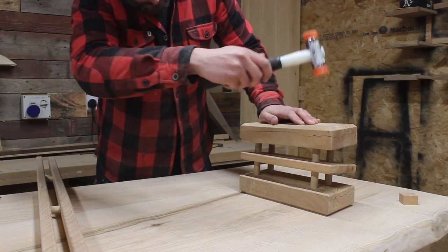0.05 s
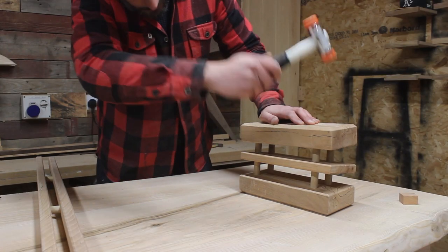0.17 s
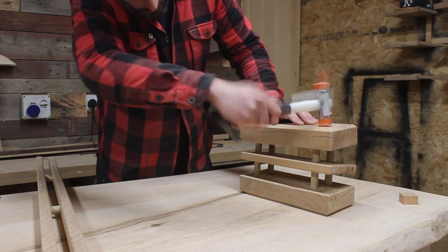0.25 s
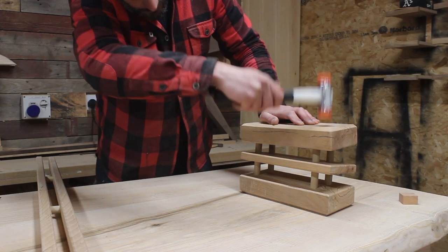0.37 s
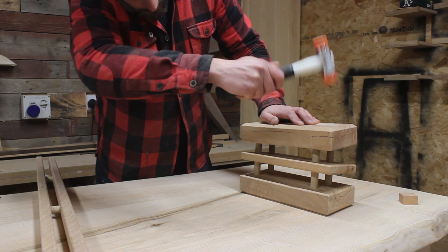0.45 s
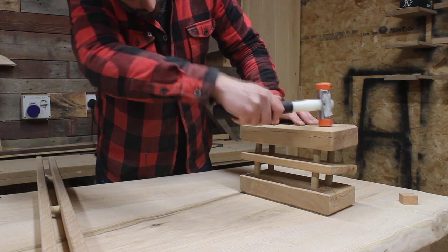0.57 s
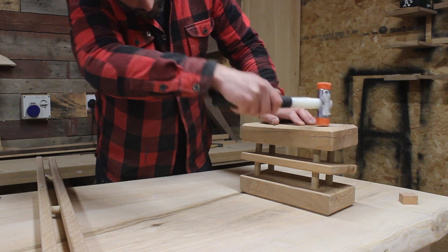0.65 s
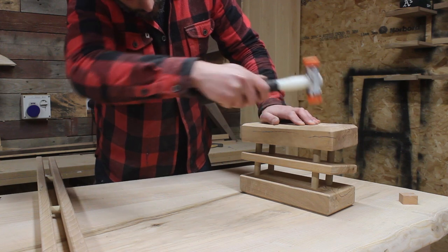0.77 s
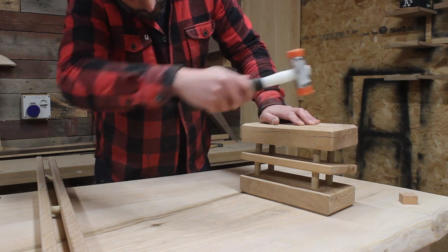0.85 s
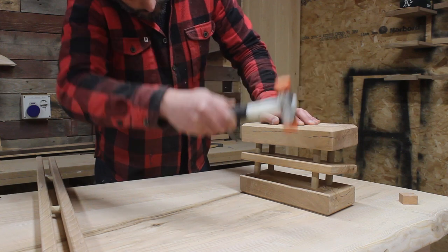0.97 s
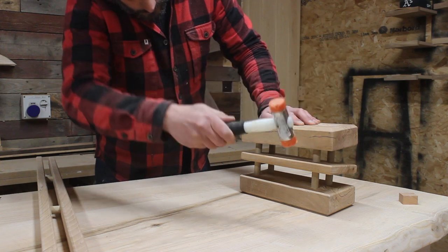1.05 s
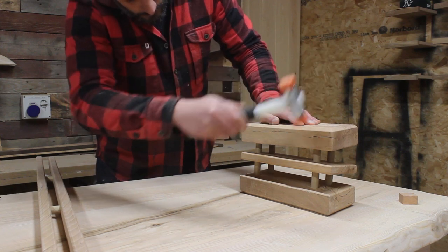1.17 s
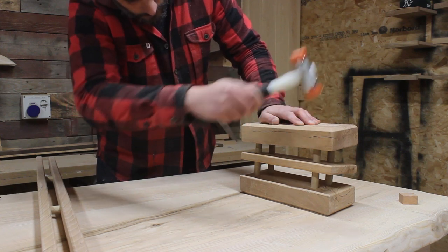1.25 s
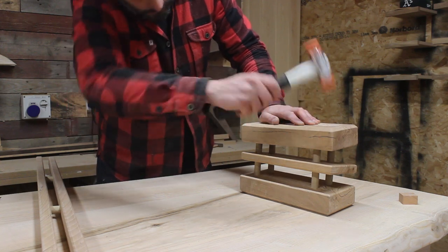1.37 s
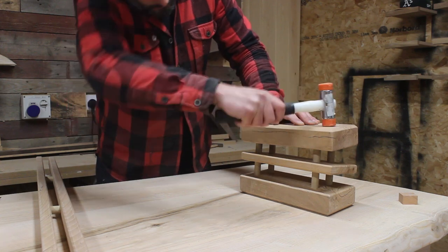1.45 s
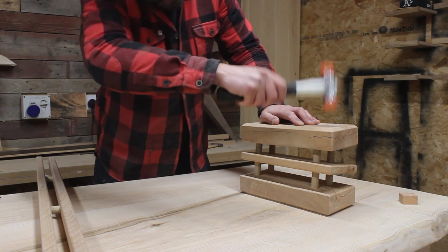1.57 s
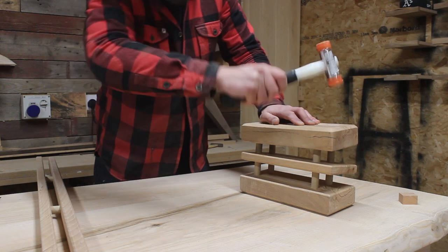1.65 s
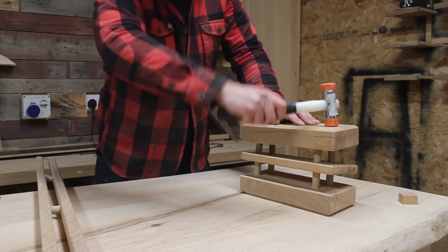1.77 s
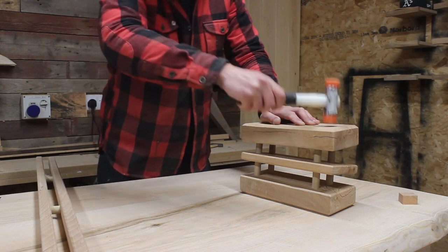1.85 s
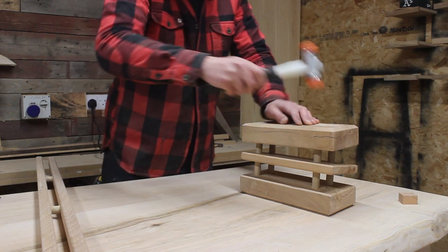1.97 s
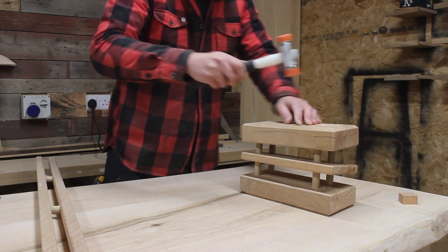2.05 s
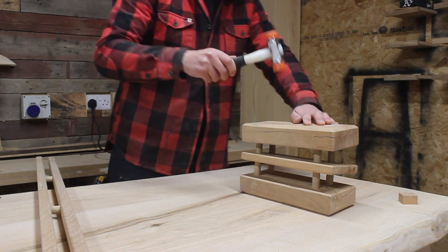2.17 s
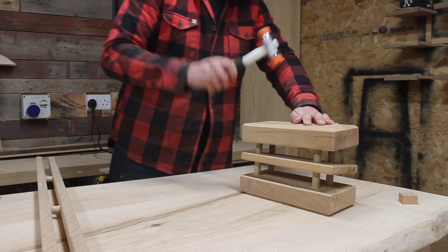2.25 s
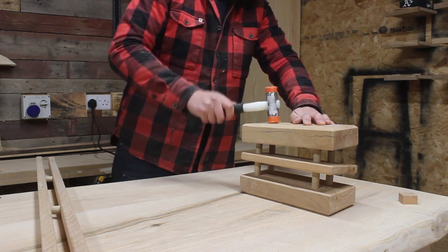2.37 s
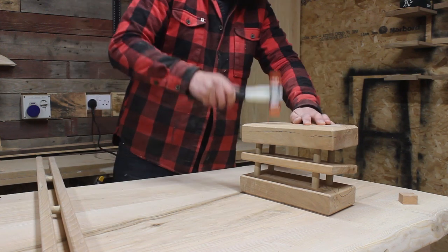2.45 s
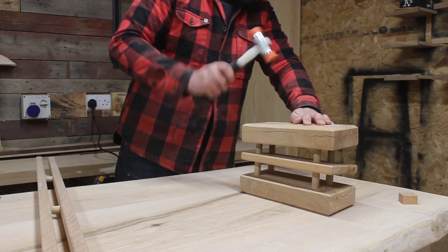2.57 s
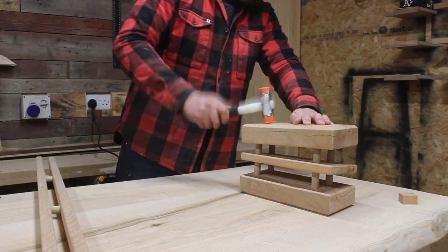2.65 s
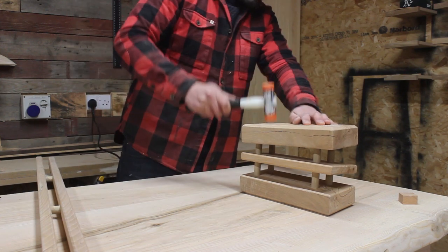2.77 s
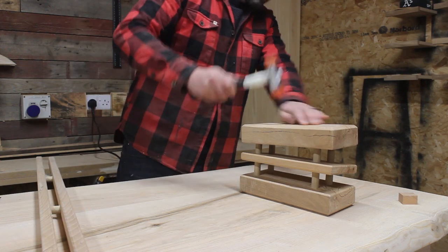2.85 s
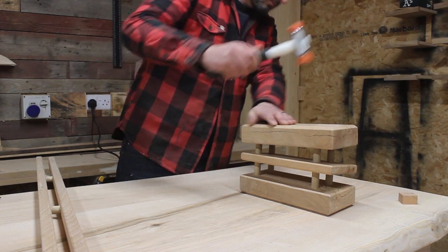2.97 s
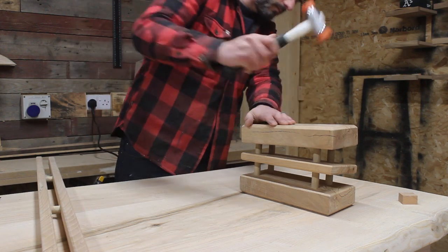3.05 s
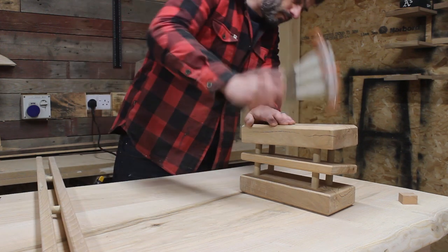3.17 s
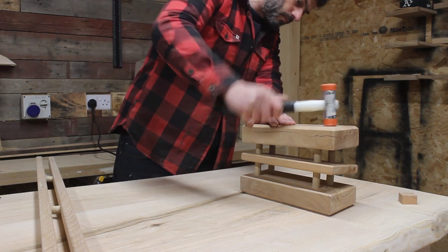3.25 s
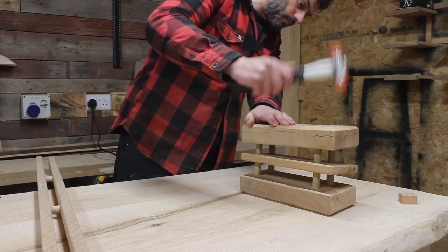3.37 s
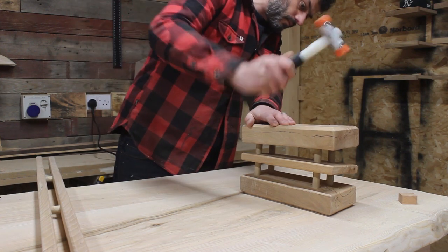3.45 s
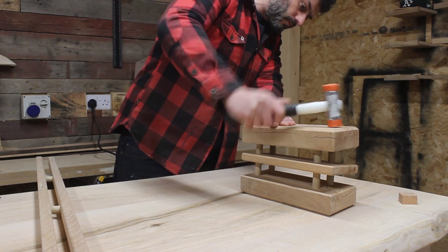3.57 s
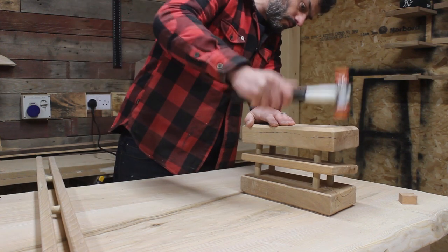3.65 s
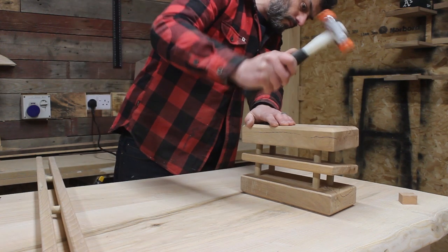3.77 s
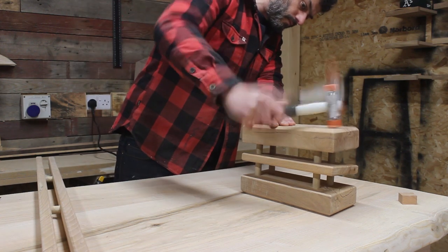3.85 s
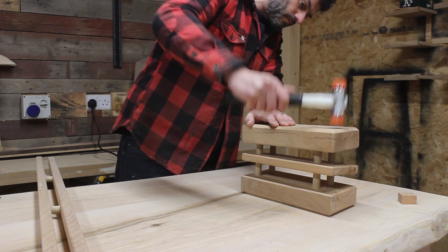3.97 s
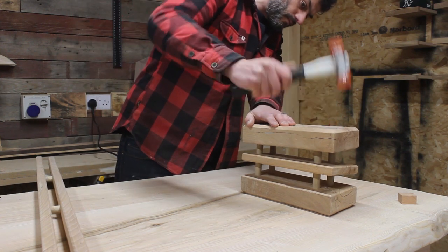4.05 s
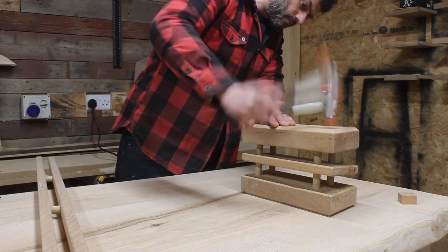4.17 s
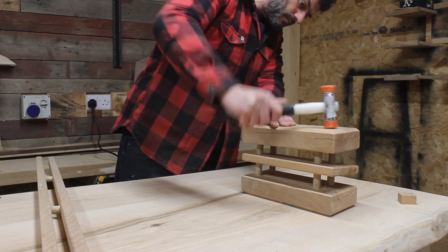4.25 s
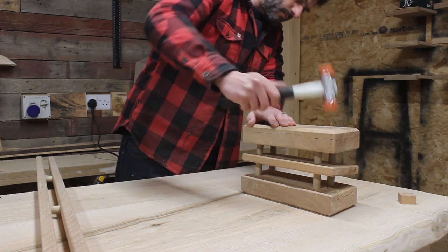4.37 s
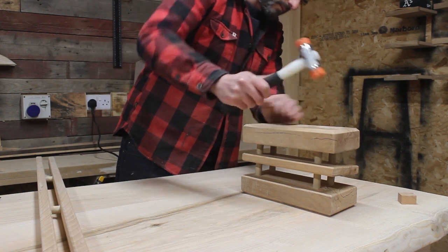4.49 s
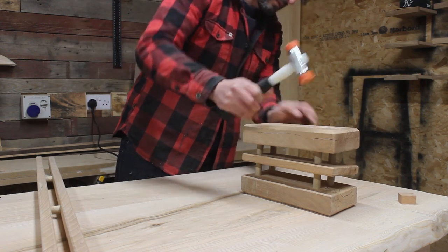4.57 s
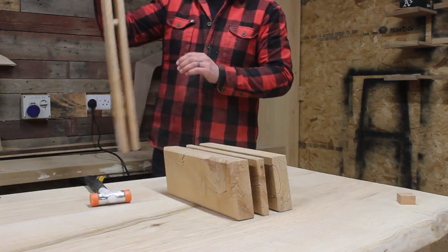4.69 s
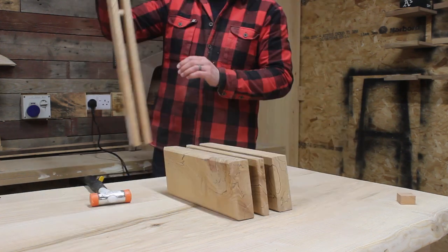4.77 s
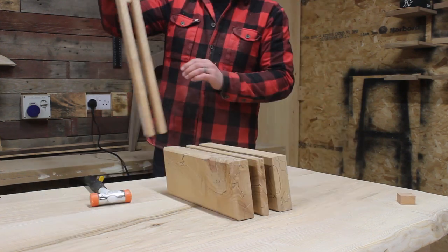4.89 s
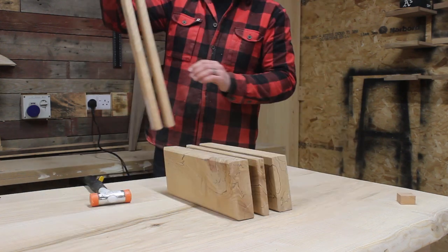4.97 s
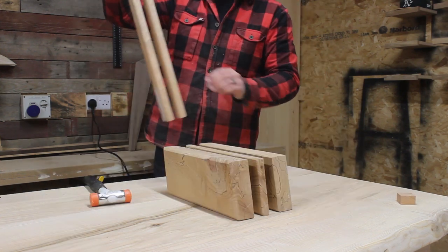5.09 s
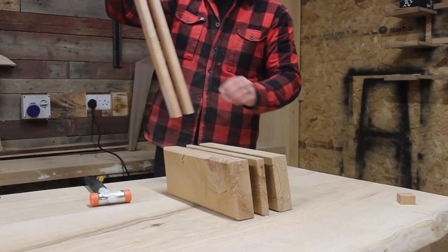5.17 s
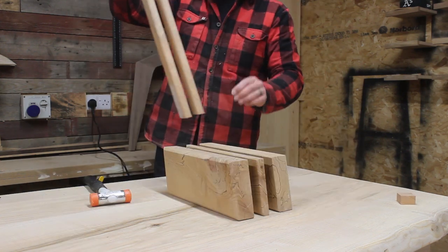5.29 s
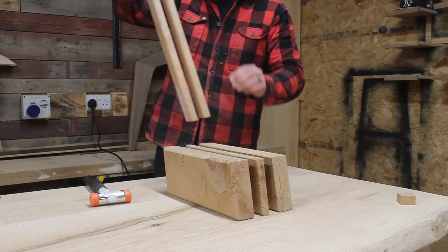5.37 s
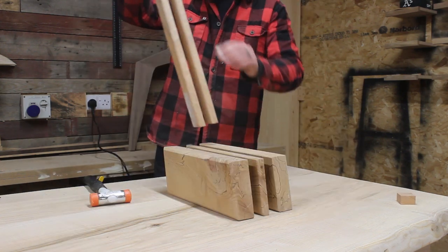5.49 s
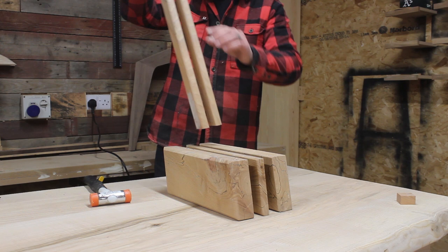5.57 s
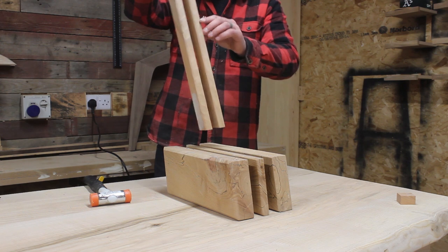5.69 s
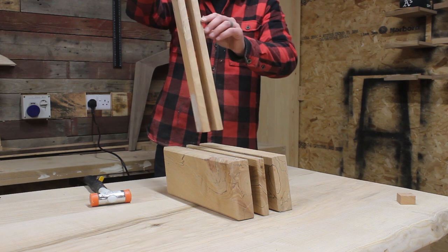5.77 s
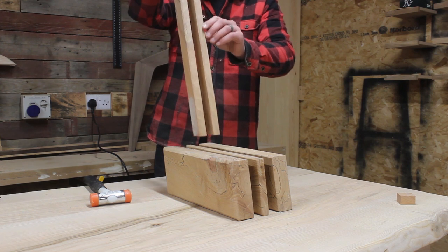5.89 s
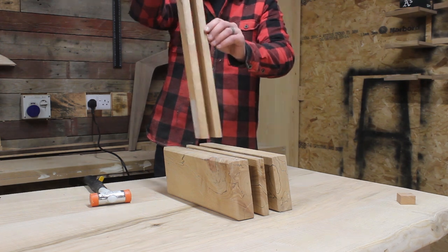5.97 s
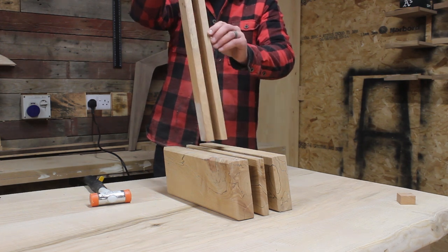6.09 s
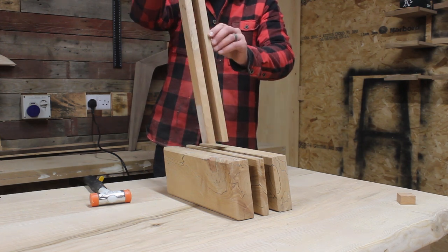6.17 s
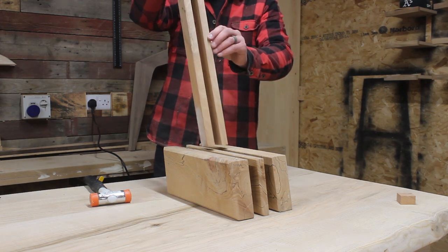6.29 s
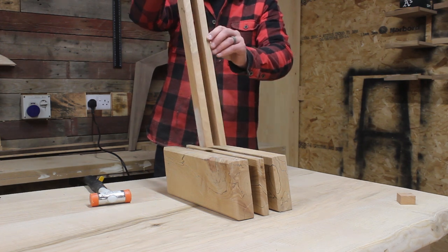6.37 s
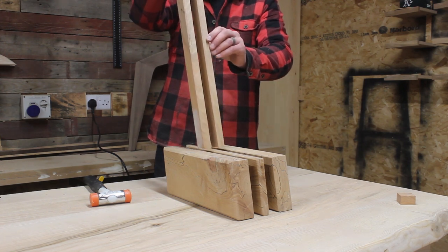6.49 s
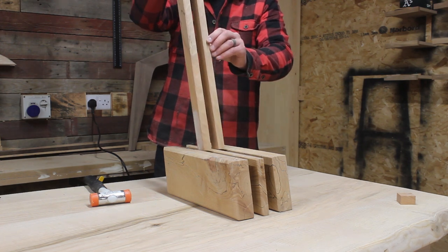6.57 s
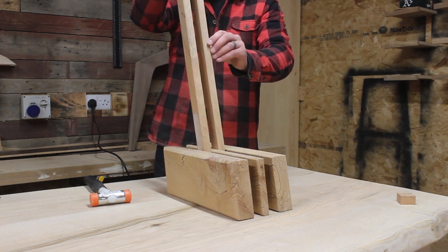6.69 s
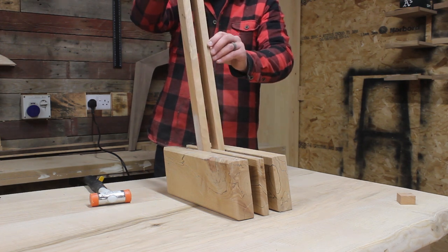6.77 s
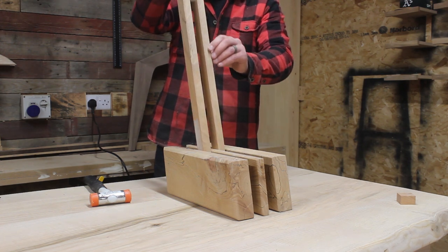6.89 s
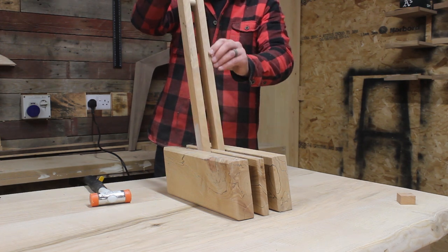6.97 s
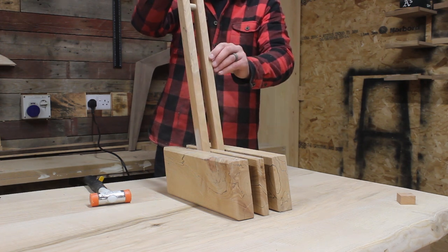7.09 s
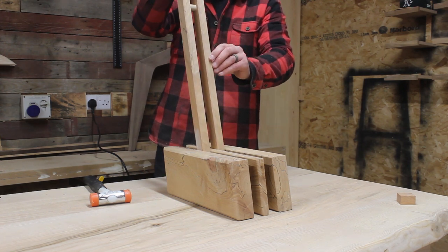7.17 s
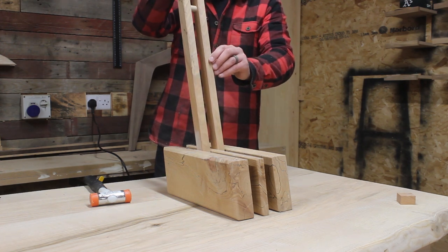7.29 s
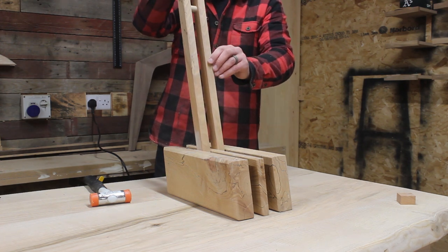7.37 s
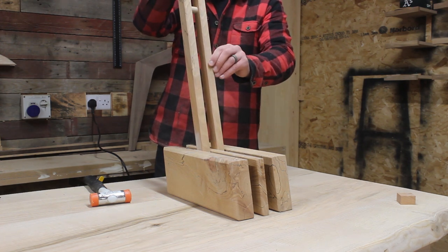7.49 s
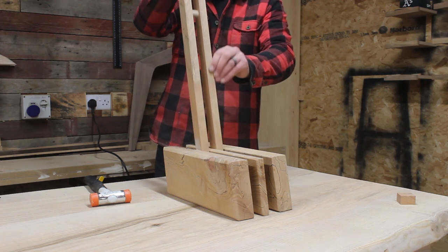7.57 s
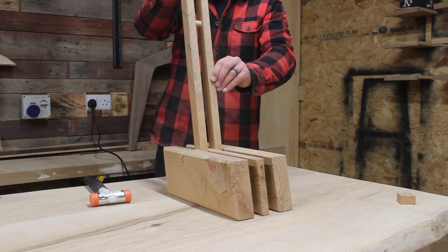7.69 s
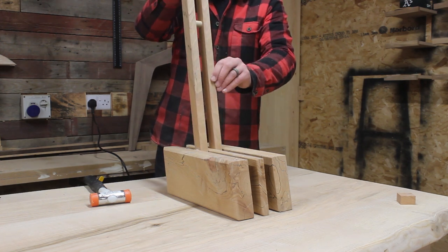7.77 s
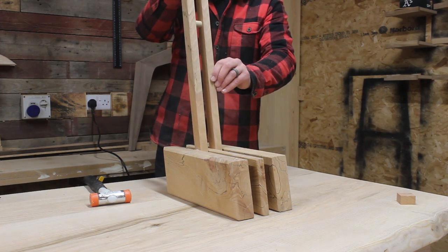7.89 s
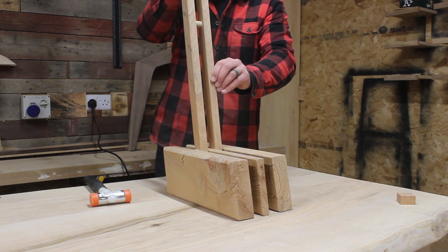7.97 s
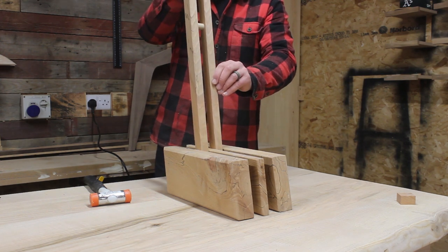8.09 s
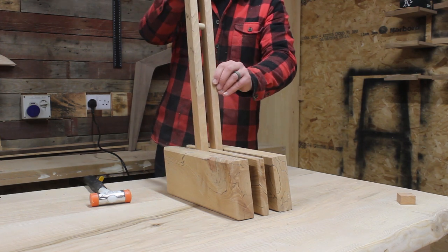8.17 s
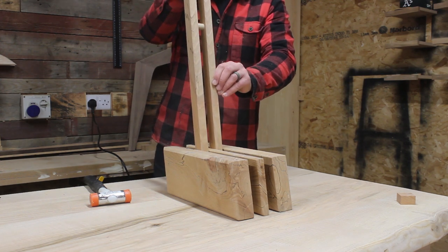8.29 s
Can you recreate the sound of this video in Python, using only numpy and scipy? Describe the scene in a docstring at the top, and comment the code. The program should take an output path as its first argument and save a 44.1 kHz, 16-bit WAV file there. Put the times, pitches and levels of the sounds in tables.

```python
"""In a timber workshop a soft-faced mallet drives a block onto its dowels, in groups of two and four blows.
Each blow excites the decaying modes of block and bench. After a brief dip in level, a pair of rails drops
into the slotted blocks, is knocked, and slides down: collisions and friction grains ring the rail modes.
Squeaks are unsteady harmonic tones and chirps are pure glides; reflections and steady air surround them.
The camera's gain control ducks the room at loud sounds, then lets it creep back; peaks it misses are clipped."""
import sys
import numpy as np
from scipy import signal
from scipy.fft import rfft, irfft
from scipy.io import wavfile
from scipy.ndimage import uniform_filter1d

SR = 44100
rng = np.random.default_rng(int(sys.argv[2]) if len(sys.argv) > 2 else 0)


def to_wav(sig):
    """Store sig (one row per channel, or 1-D mono) as 16-bit WAV at the path in sys.argv[1].

    Samples outside -1..1 are clipped; the rate is SR.
    """
    pcm = np.clip(np.atleast_2d(sig), -1, 1) * 32767
    pcm = np.round(pcm).astype(np.int16)
    wavfile.write(sys.argv[1], SR, pcm.T)  # frames by channels


def volts_from_db(level):
    """Convert decibel levels to linear amplitude ratios."""
    exponent = np.asarray(level, float) / 20
    return 10 ** exponent


N = 367353  # samples heard
LEAD = round(.4 * SR)  # samples computed before time zero
SPAN = N + LEAD

# Mallet blows: start_s, energy_db, bench_thud_db, hollow_ring_db, hollow_centre_hz
MALLET_BLOWS = [(-.29, 39.5, 6, 5.5, 1130), (0.346, 40, 4.5, 6, 1155), (.652, 35.5, 5, 3.5, 1059),
                (1.5175, 39.5, 5.5, 3.5, 1130), (1.806, 37.5, 5, 3.5, 1036), (2.4299, 41, -5.5, 6, 1130),
                (2.743, 40, -2, 7, 1130), (3.2921, 37.5, -1.5, 3, 1686), (3.617, 40, -2, 4, 1330),
                (3.949, 40, -6.5, 2.5, 1330), (4.278, 36.5, 1, 2.5, 1756)]
# Modes of block and bench, before each blow scatters them: pitch_hz, level_db, t60_s
BLOCK_MODES = [(72, -19, 0.95), (83.4, -21, 0.72), (102, -27, 0.83), (153, -17, 0.41), (185.3, -25.5, 0.8),
               (277, 7.5, 0.0057), (307, -3.5, .04), (409.7, -4.5, 0.059), (483, -6.5, 0.014),
               (525, -13, 0.075), (609.8, -4.5, 0.11), (714, -6.5, 0.071), (805, -2, 0.028),
               (1000, 7, 0.013), (1073, -4, 0.078), (1130, -5, 0.013), (1230, -5, 0.032),
               (1330, -1.5, 0.019), (1500, -9, 0.02), (1746, 3, 0.028), (2116, -5.5, 0.055),
               (2340, -15.5, .04), (4220, -23, 0.047)]
# Block modes too dense to tell apart, heard as a crack: frequency_hz, relative_level_db
BLOCK_DENSE_MODES = [(60, 10.5), (250, 38.5), (850, 40.5), (1200, 45), (2000, 37.5), (2600, 23), (4000, -1),
                     (7000, 21), (11000, 1), (16000, -13.5), (22050, -29)]
# Rails meeting the slots, and at 7.8 s a low thump of the bench: start_s, level_db, centre_hz, spread_octaves,
# crack_against_ring_db
RAIL_KNOCKS = [(6.03, -11, 893, 2.6, -9.5), (6.05, -19, 345, 1.9, -7), (6.1, -18.5, 485, 2, -12),
               (6.239, -37, 3000, 1.7, 4), (6.445, -40, 280, 1.34, -15), (6.556, -34, 4450, 1.57, -30),
               (6.674, -31, 520, 1.65, -14), (6.697, -33.5, 5000, 2.3, -20), (6.733, -29, 800, 0.2, -10),
               (6.751, -24.5, 1560, 0.92, 5), (6.76, -34, 147, 0.5, -21), (6.78, -31, 940, 0.27, -23),
               (7.512, -41.5, 2340, 0.49, -6), (7.735, -36.5, 5920, 1.6, 2), (7.761, -38.5, 186, 0.45, -7),
               (7.792, -29, 1500, 1.8, -1), (7.8, -38, 110, 0.65, -4), (7.81, -23, 860, 1.3, -16),
               (7.84, -30, 620, 0.3, -20), (7.875, -27.5, 640, 0.48, -24), (8.025, -37.5, 6000, 2.2, -16),
               (8.031, -40, 280, 0.77, -12), (8.308, -37, 620, 0.24, -20)]
# Modes of the rails when knocked, before scatter: pitch_hz, level_db, t60_s
RAIL_MODES = [(153, -11.5, 0.18), (268, 6, 0.039), (557, -4, 0.03), (620, -18.5, 0.027), (705, -9, 0.1),
              (800, -22.5, 0.11), (1122, -7.5, 0.022), (1240, -14.5, 0.032), (1560, -10.5, 0.019),
              (2057, -11.5, 0.049), (2365, -17.5, 0.049), (3000, -38, 0.071), (4590, -32, 0.13)]
# Rail modes too dense to tell apart, heard as a crack: frequency_hz, relative_level_db
RAIL_DENSE_MODES = [(60, 66), (250, 41), (1000, 47), (2500, 40.5), (5000, 29), (10000, 5), (16000, 22),
                    (22050, 8.5)]
# Strokes of wood sliding on wood: fastest_s, speeding_up_s, slowing_down_s, level_db, centre_hz
SLIDE_STROKES = [(6.075, .045, 0.063, -22, 1800), (6.7, .03, 0.031, -37.5, 800),
                 (7.04, .25, 0.22, -44.5, 1900), (7.71, 0.12, 0.062, -39, 3890),
                 (7.86, .07, 0.18, -37.5, 1303), (8.14, .09, 0.12, -49.5, 2500),
                 (8.325, .025, .03, -42.5, 700)]
# Stick-slip squeaks: start_s, length_s, level_db, pitch_hz, step_per_harmonic_db
STEADY_SQUEAKS = [(6.273, .025, -45, 1990, -4), (6.305, .025, -54, 1960, -4), (6.345, .03, -46, 2040, -14),
                  (7.665, .06, -42, 3400, -14), (7.795, .09, -49, 4650, -20)]
# Faint pure glides in the quiet: start_s, length_s, level_db, first_hz, last_hz
FAINT_CHIRPS = [(4.655, .08, -50, 3230, 3150), (4.79, .075, -53, 3100, 3500),
                (4.865, .075, -50, 3000, 3600), (4.795, .11, -57, 4540, 4780)]
# Reflections from bench and near walls: delay_ms, level_db
EARLY_REFLECTIONS = [(2.1, -17.5), (5.3, -15.5), (8.6, -12.5), (12.4, -9.5), (18.5, -12), (27, -9.5)]
# Reverberation of the workshop: frequency_hz, t60_s
SHOP_DECAY = [(100, 0.73), (260, 0.37), (700, 0.65), (1200, 0.58), (1840, 0.53), (4850, 0.41),
              (12800, 0.15)]
# Spectrum of rumble and hiss: frequency_hz, relative_level_db (per Hz)
AIR_SPECTRUM = [(15, -34.5), (25, 0), (43, -1), (76, -8), (123, -5.5), (210, -4.5), (261, -5), (448, -2.5),
                (927, -9), (1090, -7.5), (2380, -16), (8460, -29), (15700, -28.5)]


def mallet():
    """Modal excitation: a broadband force rings block and bench; where it lands sets thud and hollow ring."""
    tilt_db_per_octave, hollow_octaves = -2, .2
    out = np.zeros(SPAN)
    for s, energy_db, thud_db, hollow_db, hollow_hz in MALLET_BLOWS:
        def colour_db(hz):
            tilt = tilt_db_per_octave * np.log2(hz / 1000)
            thud = thud_db * np.exp(-(np.log2(hz / 300) / 0.7) ** 2)
            hollow = hollow_db * np.exp(-(np.log2(hz / hollow_hz) / hollow_octaves) ** 2)
            return tilt + thud + hollow
        body = ring(BLOCK_MODES, BLOCK_DENSE_MODES, 0, colour_db, scatter_db=1.8, detune=.008)
        add(out, s, volts_from_db(energy_db) * signal.fftconvolve(strike(), unit(body)))
    return out


def strike():
    """Two-stage contact: the soft face slaps flat, then squeezes; together they favour no frequency."""
    slap_band = signal.butter(4, 2900, "high", fs=SR, output="sos")
    press_band = signal.butter(4, 2900, fs=SR, output="sos")
    slap = signal.sosfilt(slap_band, contact(1.4))
    press = signal.sosfilt(press_band, contact(3.4))
    force = rfft(press + np.sign(slap @ press) * slap, 4096)
    return irfft(force / np.maximum(abs(force), .3))[:2048]


def contact(ms):
    """Contact force: a decaying, chattering burst with a flat spectrum; a longer one also starts softer."""
    t = np.arange(4096) * 1000 / SR / max(ms, .3)
    shape = (1 - np.exp(-t / .15)) * np.exp(-t)
    force = rng.standard_normal(4096)
    for _ in range(12):  # alternately impose the envelope and the flat spectrum
        force *= shape / np.sqrt(uniform_filter1d(force ** 2, size=40) + 1e-12)
        force = irfft(np.exp(1j * np.angle(rfft(force))))
    return force[:2048]


def ring(modes, crack, crack_db, colour_db, scatter_db, detune):
    """Modal superposition: dying modes, scattered at each contact point, join the crack in one response."""
    hz, db, t60 = np.transpose(modes)[:, :, None]
    level_draw, pitch_draw = rng.standard_normal((2, len(modes), 1))
    t = np.arange(32768) / SR
    level = volts_from_db(db + scatter_db * level_draw - 60 * t / t60)
    partials = level * np.cos(2 * np.pi * hz * (1 + detune * pitch_draw) * t)
    ringing = abs(rfft(partials.sum(0)))
    f = np.fft.rfftfreq(32768, 1 / SR)
    small = (f / 170) ** 4 / (1 + (f / 170) ** 4)  # a small part radiates little bass
    gain = np.hypot(ringing, volts_from_db(read(crack, f) + crack_db)) * small * volts_from_db(colour_db(f + 1))
    log_gain = np.log(np.r_[gain, gain[-2:0:-1]] + 1e-5)
    phase = -signal.hilbert(log_gain).imag  # minimum phase makes the response causal
    return np.fft.ifft(np.exp(log_gain + 1j * phase)).real


def knocks():
    """Collision: each brief contact favours rail modes near one pitch; a higher knock is shorter."""
    contact_ms_at_1k, contact_power, longest_ms = 7.0, 0.66, 11.0
    out = np.zeros(SPAN)
    for s, db, centre_hz, octaves, crack_db in RAIL_KNOCKS:
        ms = min(contact_ms_at_1k * (1000 / centre_hz) ** contact_power, longest_ms)

        def colour_db(hz):
            return -6 * (np.log2(hz / centre_hz) / octaves) ** 2
        body = ring(RAIL_MODES, RAIL_DENSE_MODES, crack_db, colour_db, scatter_db=0.71, detune=0.013)
        knock = signal.fftconvolve(unit(contact(ms)), unit(body))
        add(out, s, volts_from_db(db) * knock * np.sqrt(ms * SR / 1000))  # energy grows with contact time
    return out


def slides():
    """Sliding friction: uneven grains ring the rails while a stroke speeds up and slows down."""
    octaves, grains_per_s, grain_spread_db = 2.2, 3700, 4.5
    speed_power = 1.4  # amplitude follows speed to this power
    loose_modes = np.multiply(RAIL_MODES, [1, 1, 1.8])  # rails held loosely in the hand ring longer
    out = np.zeros(SPAN)
    for s, rise_s, fall_s, db, centre_hz in SLIDE_STROKES:
        t = np.arange(-rise_s, fall_s, 1 / SR)
        speed = np.cos(np.pi / 2 * np.where(t < 0, t / rise_s, t / fall_s)).clip(0)
        chance, size, sign = rng.random(SR), rng.exponential(1, SR), rng.standard_normal(SR)
        grains = (chance < grains_per_s / SR) * volts_from_db(grain_spread_db * np.minimum(size, 3)) * sign

        def colour_db(hz):
            return -6 * (np.log2(hz / centre_hz) / octaves) ** 2
        body = ring(loose_modes, RAIL_DENSE_MODES, -13, colour_db, scatter_db=2.5, detune=0)
        rub = signal.fftconvolve(grains, body)[4000:SR]
        rub /= np.sqrt(uniform_filter1d(rub ** 2, size=4000) + 1e-12)  # even out the level
        add(out, s - rise_s, volts_from_db(db) * speed ** speed_power * rub[:len(t)])
    return out


def squeaks():
    """Stick-slip oscillation: squeaks carry four harmonics; gliding chirps carry the fundamental alone."""
    out = np.zeros(SPAN)
    for s, length_s, db, hz, step_db in STEADY_SQUEAKS:
        add(out, s, thin_tone(length_s, db, hz, hz, step_db, count=4))
    for s, length_s, db, first_hz, last_hz in FAINT_CHIRPS:
        add(out, s, thin_tone(length_s, db, first_hz, last_hz, 0, count=1))
    return out


def thin_tone(length_s, db, first_hz, last_hz, step_db, count):
    """Irregular oscillation: shaky in pitch and broken in level, the tone swells quickly and fades."""
    along = np.arange(0, length_s, 1 / SR) / length_s
    noise = rng.standard_normal((2, SR // 4))
    shake, flutter = (evened(uniform_filter1d(v, size=120))[:len(along)] for v in noise)
    pitch_hz = (first_hz + (last_hz - first_hz) * along) * (1 + .034 * shake)
    turns = np.cumsum(pitch_hz) / SR
    tone = sum(volts_from_db(k * step_db) * np.sin(2 * np.pi * (k + 1) * turns) for k in range(count))
    swell_db = np.interp(along, [0, .35, 1], [-9, 0, -9])
    return volts_from_db(db + swell_db + 3.5 * flutter) * tone * signal.windows.tukey(len(along), .3)


def echoes(x):
    """Early reflection: single delayed copies of alternating sign, dulled by rough timber."""
    dull = signal.sosfilt(signal.butter(1, 3500, fs=SR, output="sos"), x)
    out = np.zeros(SPAN)
    for k, (ms, db) in enumerate(EARLY_REFLECTIONS):
        out += (-1) ** k * volts_from_db(db) * np.roll(dull, round(ms * SR / 1000))
    return out


def shop(x):
    """Reverberation: sparse reflections die by band; three tails take turns as the source shifts about."""
    taps = np.zeros((3, SR))
    at = np.arange(200, SR - 20, 20) + rng.integers(0, 20, (3, (SR - 201) // 20))
    np.put_along_axis(taps, at, rng.choice([-1., 1.], at.shape), 1)
    hz, t, z = signal.stft(taps, SR, nperseg=256)
    decay = volts_from_db(-60 * t / read(SHOP_DECAY, hz)[:, None])
    tails = signal.istft(z * decay, SR, nperseg=256)[1]
    tails /= np.linalg.norm(tails[0])
    turn = np.arange(SPAN) / SR / .95 + np.arange(3)[:, None] / 3  # half a cycle takes .95 s
    shares = np.sqrt(2 / 3) * np.cos(np.pi * turn)  # the three powers sum to 1
    return signal.fftconvolve(x * shares, tails, axes=1)[:, :SPAN].sum(0)


def air():
    """Stationary noise: random spectra shaped into workshop rumble and microphone hiss, faintly patchy."""
    frames, hz = SPAN // 256 + 5, np.fft.rfftfreq(1024, 1 / SR)
    real, imaginary, patches = rng.standard_normal((frames, 513, 3)).T
    patches = uniform_filter1d(patches, 10, axis=0)  # smooth over frequency
    patches = evened(uniform_filter1d(patches, 14, axis=1))  # smooth over time
    level_db = read(AIR_SPECTRUM, hz)[:, None] + 0.98 * patches
    z = (real + 1j * imaginary) * volts_from_db(level_db)
    noise = signal.istft(z, nperseg=1024, noverlap=768)[1][:SPAN]
    return volts_from_db(-45.5) * evened(noise)


def evened(x):
    """Power normalisation: scales to rms 1."""
    return x / np.sqrt(np.mean(x ** 2) + 1e-20)


def unit(x):
    """Energy normalisation: scales a short sound to energy 1."""
    return x / np.linalg.norm(x)


def read(points, hz):
    """Logarithmic interpolation: reads a table of frequency and value on a log frequency axis."""
    f, value = np.transpose(points)
    return np.interp(np.log(hz + 1), np.log(f + 1), value)


def add(mix, s, sound):
    """Superposition: adds a sound at time s to a mix that starts a little before zero."""
    part = mix[LEAD + round(s * SR):][:len(sound)]
    part += sound[:len(part)]


def scene():
    """Superposition of direct sound, early reflections, reverberation and air."""
    blows = mallet()
    parts = knocks() + slides()
    thin = squeaks()
    direct = blows + parts + thin
    early = echoes(blows + parts)
    late = shop(volts_from_db(-4.0) * blows + volts_from_db(-2.0) * parts + volts_from_db(-1.5) * thin)
    return (direct + early + late + air())[None, LEAD:]


def top_cut(x):
    """Nothing passes above the cut-off."""
    return signal.sosfilt(signal.butter(12, 15880, fs=SR, output="sos"), x)


def record(dry):
    """Gain control: level falls within milliseconds of an overload and climbs back; what it misses is clipped."""
    camera_db = -1.16
    dip_s, dip_depth_db, fade_out_s, fade_in_s = 4.618, -14.5, 0.62, 0.39
    # the microphone drops deep bass
    dry = signal.sosfilt(signal.butter(2, 45, "high", fs=SR, output="sos"), dry)
    power = signal.lfilter([.004], [1, .004 - 1], dry[0] ** 2)
    level_db = 10 * np.log10(power + 1e-12)
    over_db = 0.81 * np.maximum(level_db + 12, 0)
    over_db[0] = 14  # still ducked by an earlier blow
    climb = np.arange(N) * 20.5 / SR  # 20.5 dB regained per second
    duck_db = np.maximum.accumulate(over_db + climb) - climb
    lag = np.exp(-1 / (0.013 * SR))  # 13 ms response time
    duck_db = signal.lfilter([1 - lag], [1, -lag], duck_db - duck_db[0]) + duck_db[0]
    # the whole level dips briefly
    away = np.arange(N) / SR - dip_s
    distance = np.where(away < 0, -away / fade_out_s, away / fade_in_s)
    dip_db = dip_depth_db * np.maximum(1 - distance, 0) ** 2
    clipped = np.clip(dry * volts_from_db(camera_db + dip_db - duck_db), -1, 1)
    # the converter rolls off the top
    finished = signal.sosfilt(signal.butter(2, 14500, fs=SR, output="sos"), clipped)
    return top_cut(finished)


dry = scene()
out = record(dry)
to_wav(out)
```